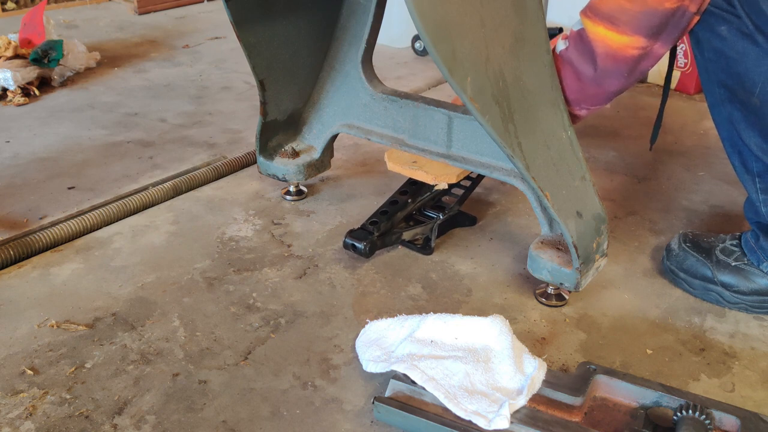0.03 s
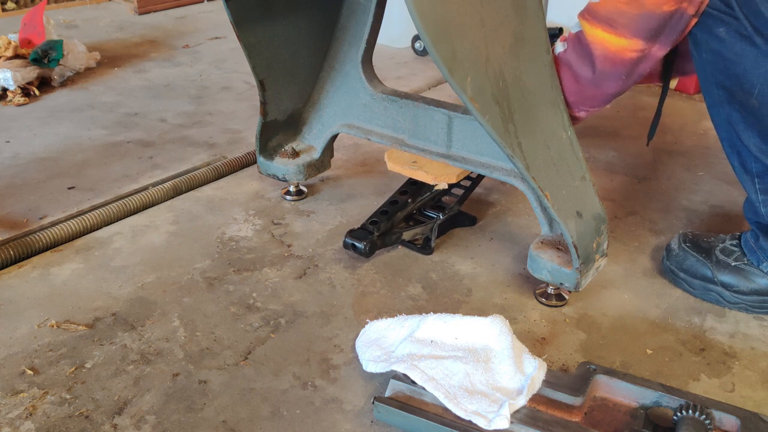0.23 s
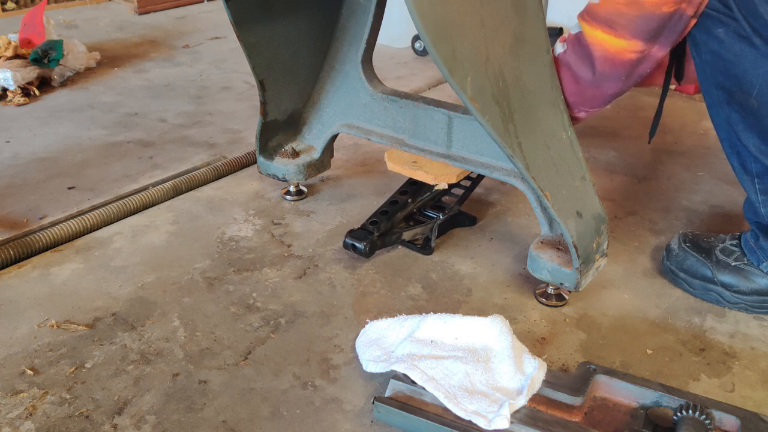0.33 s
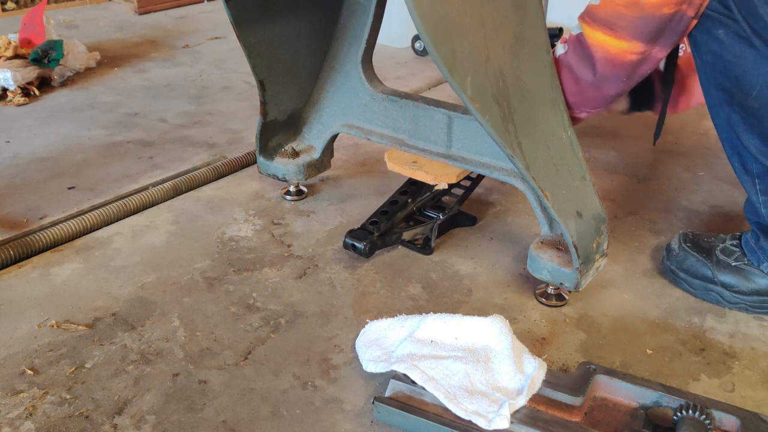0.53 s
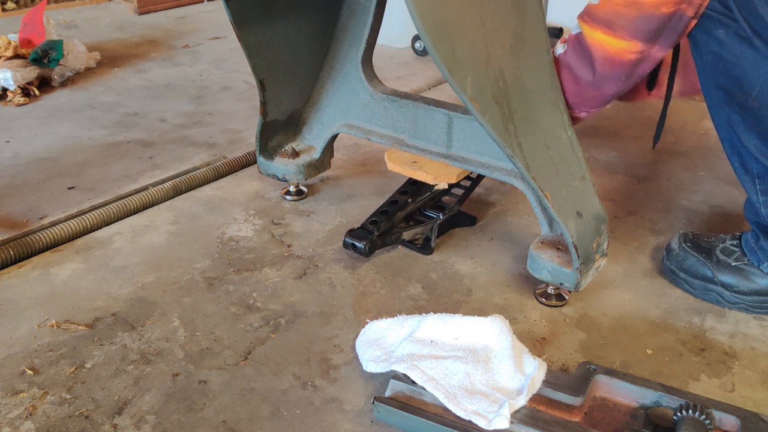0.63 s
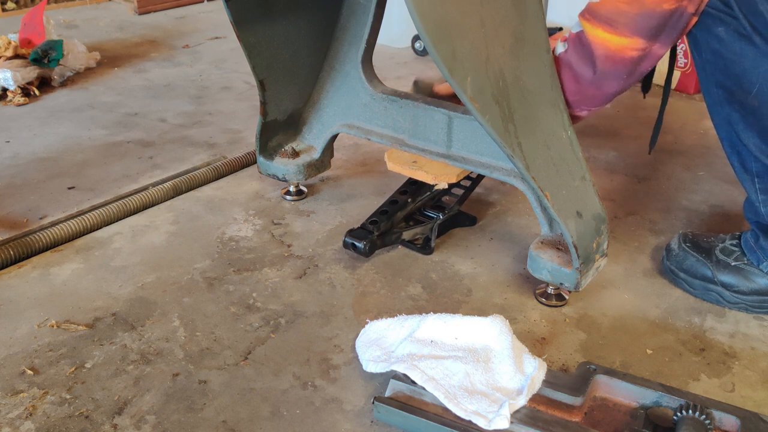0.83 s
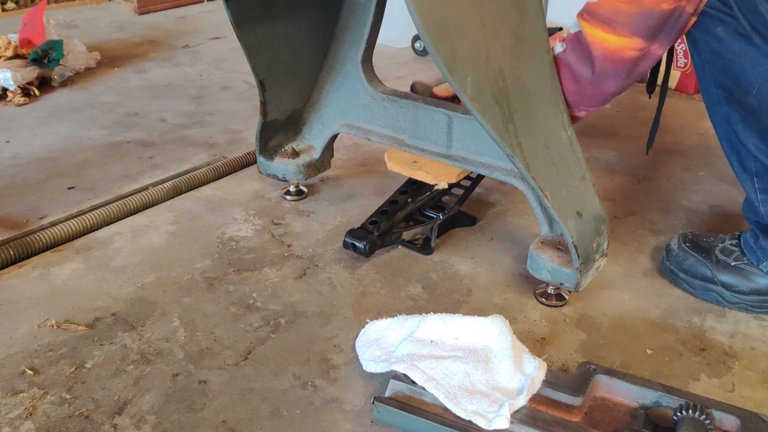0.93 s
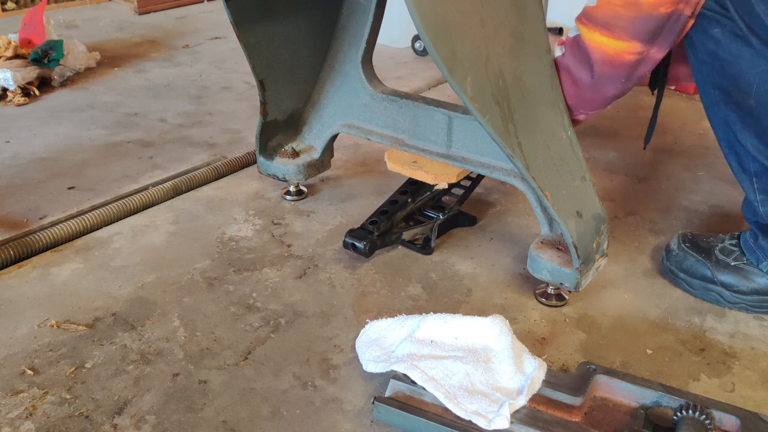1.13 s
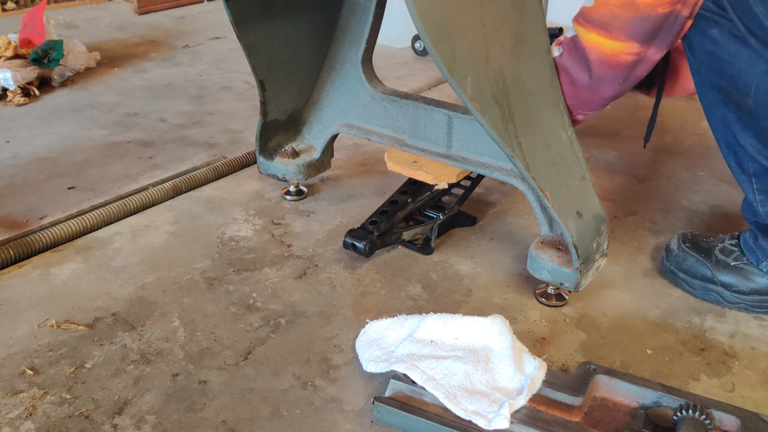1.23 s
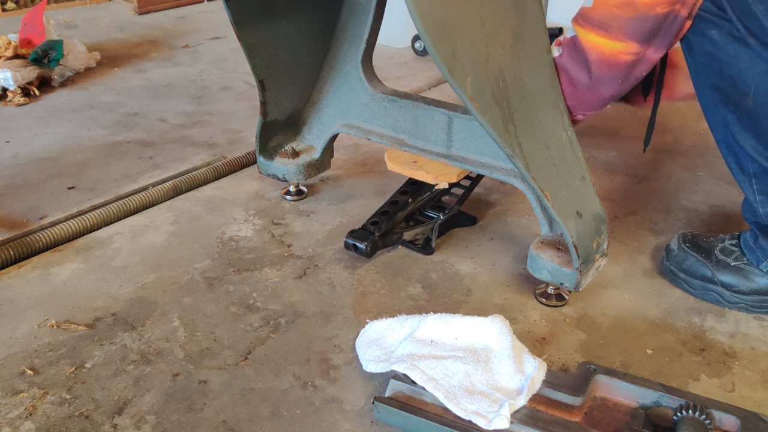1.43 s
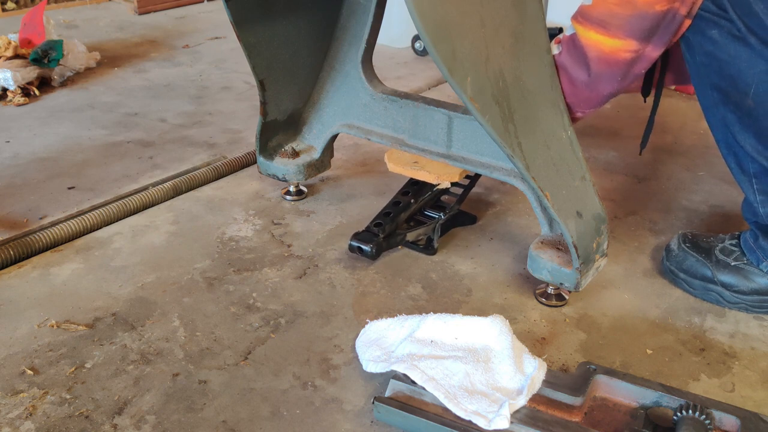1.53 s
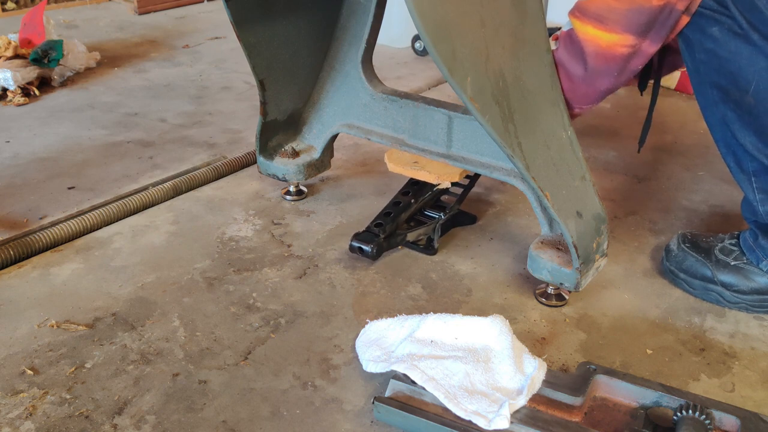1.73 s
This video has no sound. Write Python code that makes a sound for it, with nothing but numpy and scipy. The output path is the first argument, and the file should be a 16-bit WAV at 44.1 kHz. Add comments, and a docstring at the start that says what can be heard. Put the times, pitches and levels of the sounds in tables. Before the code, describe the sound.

Two short runs of rapid ratchet clicking on a small jack, its handle knocking softly.

```python
"""A ratchet on a small scissor jack, swung back twice under a cast-iron machine foot.
The pawl snaps over the teeth as fast as the handle moves; each snap rings the steel head and shakes
the jack's frame. The loose handle knocks around the strokes. The concrete-floored workshop
reverberates over a low hum."""
import sys
import numpy as np
from scipy import signal
from scipy.fft import rfft, irfft
from scipy.io import wavfile

SR = 44100
rng = np.random.default_rng(int(sys.argv[2]) if len(sys.argv) > 2 else 0)


def write(x):
    x = np.atleast_2d(x).T
    wavfile.write(sys.argv[1], SR, np.round(np.clip(x, -1, 1) * 32767).astype(np.int16))


N = 79380

# modes of the loaded jack frame, with the cast-iron machine foot ringing at 199.5 Hz: f/Hz, level/dB, t60/s
FRAME_MODES = [(199.5, -14, 0.94), (275, -14, 0.059), (544, -8.5, 0.11), (688.8, 3.5, 0.16),
               (749, -1.5, 0.13), (782, -8, 0.047), (932.4, -10, 0.096), (972.5, -10.5, 0.15)]


def undb(db):
    """Decibels to gain."""
    return 10 ** (np.asarray(db) / 20)


def level(x, db):
    """Set the rms level."""
    return x * undb(db) / np.sqrt(np.mean(x ** 2))


def along(points, hz):
    """Read a table on a log-frequency axis."""
    f, v = np.array(points, float).T
    return np.interp(np.log(hz + 1), np.log(f), v)


def colour(x, points):
    """Minimum-phase filter through points f/Hz, level/dB."""
    size = 2 * N
    gain = undb(along(points, np.arange(N + 1) * SR / size))
    cepstrum = irfft(np.log(gain))
    cepstrum[1:N] *= 2
    cepstrum[N + 1:] = 0
    return irfft(rfft(x, size) * np.exp(rfft(cepstrum)))[..., :N]


def stereo_noise(corner_hz=1070):
    """Diffuse noise: coherent between sides in the bass, unrelated in the treble."""
    mid, side = rfft(rng.standard_normal((2, N)))
    hz = np.arange(len(mid)) * SR / N
    coherence = .85 / (1 + (hz / corner_hz) ** 4)
    sign = np.array([[1], [-1]])
    return irfft(mid * np.sqrt((1 + coherence) / 2) + sign * side * np.sqrt((1 - coherence) / 2), N)


def bursts(at_s, db, envelope):
    """A noise burst at each time; overlaps add in power."""
    hits = np.zeros(N)
    np.add.at(hits, np.clip(at_s * SR, 0, N - 1).astype(int), undb(db) ** 2)
    power = signal.fftconvolve(hits, envelope ** 2)[:N]
    return np.sqrt(np.maximum(power, 0)) * stereo_noise()


def ring(x, modes):
    """Drive decaying modes; level/dB sets each mode's energy."""
    t = np.arange(N) / SR
    response = sum(undb(db) / np.sqrt(t60) * np.exp(-np.log(1000) * t / t60) * np.sin(2 * np.pi * hz * t)
                   for hz, db, t60 in modes)
    return signal.fftconvolve(x, response[None], axes=1)[:, :N]


def placed(x, room, wet_db, rms_db):
    """Add reverberation, then set the level of the sum."""
    wet = signal.fftconvolve(x, room, axes=1)[:, :N]
    return level(x + undb(wet_db) * wet, rms_db)


def workshop(build_s=0.0039):
    """Room response: a diffuse tail that dies sooner in the treble."""
    decay = [(150, 0.6), (700, 0.57), (2000, 0.45), (4500, 0.41), (8000, 0.31), (15000, 0.26)]  # reverberation: f/Hz, t60/s
    t = np.arange(N) / SR
    spectrum = rfft(stereo_noise())
    hz = np.arange(spectrum.shape[1]) * SR / N
    octave = np.log2(np.clip(hz, 125, 16000) / 125)
    tail = 0
    for k in range(8):
        band = irfft(spectrum * np.maximum(1 - abs(octave - k), 0), N)
        t60_s = along(decay, 125 * 2 ** k)
        tail += band * np.exp(-np.log(1000) * t / t60_s)
    tail *= 1 - np.exp(-t / build_s)
    return tail / np.sqrt(np.sum(tail ** 2) / 2)


def background(drone_hz=85.9, waver_db=3):
    """Room air, mains hum and a low drone that swells and fades."""
    air = [(20, -3.5), (40, -2), (60, 5.5), (130, -12), (300, -14.5), (700, -24), (1300, -28.5),
           (3000, -28), (7000, -37), (10000, -36.5), (15000, -32)]  # noise spectrum: f/Hz, level/dB
    mains = [(59.2, -63.5), (118.4, -69.5)]  # hum partials: f/Hz, level/dB
    swell = [(0, -60), (.3, -58), (.62, -52), (.8, -63.5), (1.0, -66), (1.4, -58), (1.8, -71.5)]  # drone envelope: t/s, level/dB
    t = np.arange(N) / SR
    tone = lambda hz: np.sqrt(2) * np.sin(2 * np.pi * (hz * t + rng.random()))
    waver = np.interp(t, np.linspace(0, t[-1], 20), rng.standard_normal(20))
    drone = tone(drone_hz) * undb(np.interp(t, *np.array(swell).T) + waver_db * waver)
    noise = level(colour(stereo_noise(), air), db=-57)
    hum = sum(undb(db) * tone(hz) for hz, db in mains)
    return noise + drone + hum


def handle_knocks(room, decay_s=0.0066):
    """The handle takes up its slack: a clack and clink, the frame's ring and a dull thud."""
    knocks = [(.012, -7, -6, -17), (0.114, -9, -40, -20), (0.698, -6.5, -25, -19), (0.865, -13.5, -5, -13),
              (.876, -4, -2.5, -38), (1.037, -10.5, -13, -14), (1.045, -4, 1.5, -19.5), (1.465, 3, 10, -3),
              (1.481, 6.5, 6.5, 0)]  # handle blows: t/s, clack/dB, frame/dB, thud/dB
    clack_eq = [(300, -4), (1000, 2), (1350, -1.5), (1700, 2), (2100, 1), (3200, 3), (4300, -3.5),
                (6500, -19.5), (10000, -29.5), (16000, -25)]  # clack spectrum: f/Hz, level/dB
    thud_eq = [(50, -10.5), (120, -3), (210, -1), (290, -7), (400, -13.5), (1000, -27)]  # thud spectrum: f/Hz, level/dB
    handle_modes = [(754, 2, 0.033), (1165, -4.5, 0.037), (1468, -11.5, 0.11), (1720, -2, 0.064),
                    (2146, -7.5, 0.11), (2710, -11.5, 0.14), (3070, -0.5, 0.028), (3337, 1.5, 0.051),
                    (3900, -7, 0.071)]  # loose handle: f/Hz, level/dB, t60/s
    at_s, clack_db, frame_db, thud_db = np.array(knocks).T
    envelope = np.exp(-np.arange(N) / SR / decay_s)
    blows = bursts(at_s, clack_db, envelope)
    frame = ring(bursts(at_s, frame_db, envelope), FRAME_MODES)
    thud = colour(bursts(at_s, thud_db, envelope), thud_eq)
    return (placed(colour(blows, clack_eq), room, wet_db=-5, rms_db=-59.5)
            + placed(ring(blows, handle_modes), room, wet_db=-5, rms_db=-64)
            + placed(frame, room, wet_db=-6, rms_db=-60.5)
            + placed(thud, room, wet_db=3, rms_db=-61))


def teeth(stroke, jitter_s=0.00023, scatter_db=.8):
    """Pawl drops in one stroke, one per tooth passed: t/s, level/dB, frame share/dB."""
    knot_s, teeth_per_s, snap_db, share_db = np.array(stroke).T
    t = np.arange(knot_s[0], knot_s[-1], 1 / SR)
    passed = np.cumsum(np.interp(t, knot_s, teeth_per_s)) / SR
    at_s = np.interp(np.arange(int(passed[-1]) + 1), passed, t)
    late, hard = rng.standard_normal((100, 2))[:len(at_s)].T
    return np.array([at_s + jitter_s * late,
                     np.interp(at_s, knot_s, snap_db) + scatter_db * hard,
                     np.interp(at_s, knot_s, share_db)])


def steel_head(at_s, snap_db, envelope, detune=0.00827, seats=5):
    """The head rings; its modes shift a little as the pawl seats differently from tooth to tooth."""
    head_modes = [(1753, -6.5, 0.065), (2406, -4.5, 0.13), (2460, -4, 0.23), (2983, -19.5, 0.18),
                  (3444, -5, .08), (4430, -6, 0.26), (4517, -3.5, 0.15), (4560, 0.5, 0.27),
                  (4604, -1, 0.082), (4740, -38, 0.12), (6900, -15, 0.089), (7060, -4.5, 0.067)]  # ratchet head: f/Hz, level/dB, t60/s
    head = 0
    for k, seat in enumerate(rng.permutation(np.linspace(-1, 1, seats))):
        drive = bursts(at_s[k::seats], snap_db[k::seats], envelope)
        head += ring(drive, np.array(head_modes) * [1 + detune * seat, 1, 1])
    return head


def ratchet(room):
    """Each snap of the pawl ticks, buzzes briefly, rings the head and shakes the frame."""
    strokes = [
        [(.202, 78, -4, -7), (.24, 108, -5, -7), (.31, 108, -4, -2.5), (.37, 89, 0, -19), (.46, 89, 0.5, -6.5),
         (.50, 53, 0, 2.5), (.545, 59, 0.5, -8.5)],
        [(1.091, 37, -7.5, 8), (1.111, 61, -1, 2), (1.14, 82, -4, 9.5), (1.2, 94, -2.5, 2.5),
         (1.26, 88, -0.5, 4.5), (1.29, 86, 0, 8), (1.32, 86, 0, 9.5), (1.355, 60, 1, 5.5),
         (1.385, 36, -2.5, 24)],
    ]  # per handle stroke: t/s, rate/(teeth/s), level/dB, frame share/dB
    tick_eq = [(500, -33), (2500, -10.5), (5000, -9), (7000, -3), (9500, -7.5), (12000, -1.5), (13800, 6.5),
               (16000, -1)]  # tick spectrum: f/Hz, level/dB
    buzz_eq = [(150, -26), (400, -14.5), (560, -8), (1100, -14), (1700, 2), (2100, -1.5), (3200, 3),
               (5500, -1), (6900, -0.5), (8000, -8), (9500, -7.5), (12000, -7.5), (13800, -3), (16000, -3)]  # buzz spectrum: f/Hz, level/dB
    tick_decay_s, buzz_rise_s, buzz_decay_s = 0.00053, 0.00043, 0.0045
    tick_growth = 3.4  # the tick grows faster with force than the buzz
    t = np.arange(N) / SR
    at_s, snap_db, share_db = np.hstack([teeth(stroke) for stroke in strokes])
    envelope = np.exp(-t / buzz_decay_s) * (1 - np.exp(-t / buzz_rise_s))
    ticks = colour(bursts(at_s, tick_growth * snap_db, np.exp(-t / tick_decay_s)), tick_eq)
    head = steel_head(at_s, snap_db, envelope)
    buzz = colour(bursts(at_s, snap_db, envelope), buzz_eq)
    frame = ring(bursts(at_s, snap_db + share_db, envelope), FRAME_MODES)
    return (placed(ticks, room, wet_db=2.5, rms_db=-45.5)
            + placed(buzz, room, wet_db=0.5, rms_db=-40.5)
            + placed(head, room, wet_db=5.5, rms_db=-43)
            + placed(frame, room, wet_db=-6, rms_db=-51))


def scene():
    """Ratchet and knocks in one room; background slightly left."""
    room = workshop()
    return ratchet(room) + handle_knocks(room) + background() * undb([[1.2], [-1.2]])


def record(dry):
    """Steep elliptic low-pass."""
    cutoff_hz = 15900
    return signal.sosfilt(signal.ellip(10, .2, 80, cutoff_hz, fs=SR, output="sos"), dry)


dry = scene()
out = record(dry)
write(out)
```